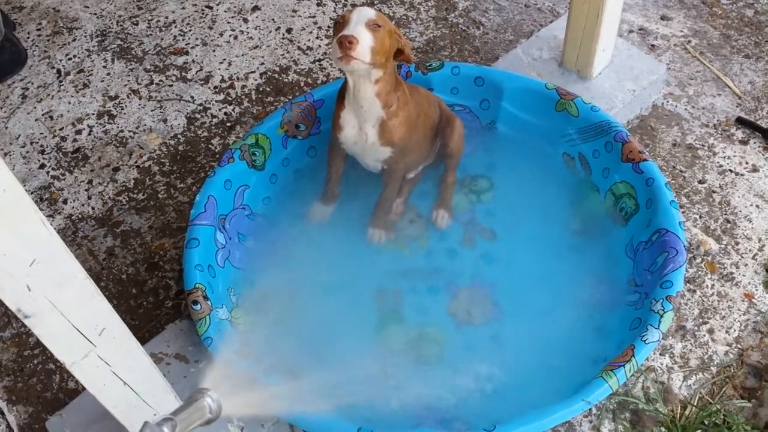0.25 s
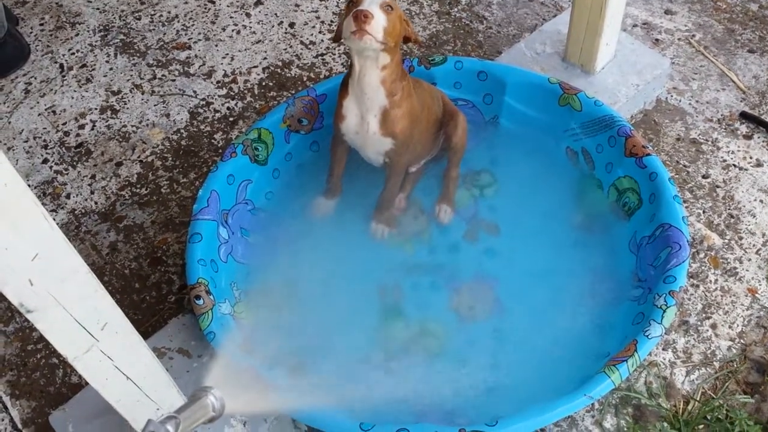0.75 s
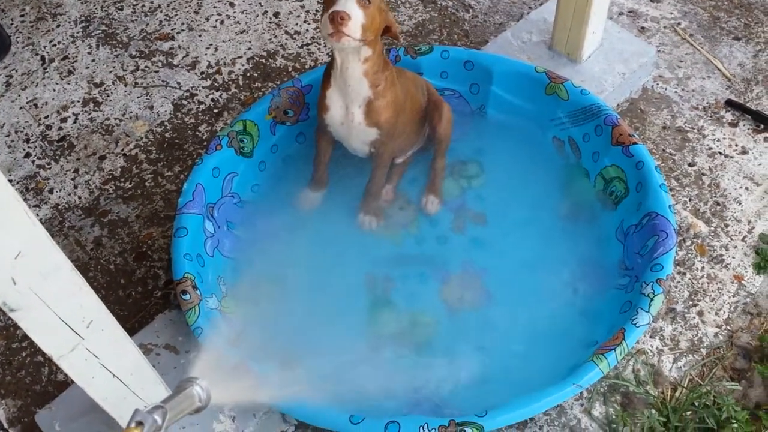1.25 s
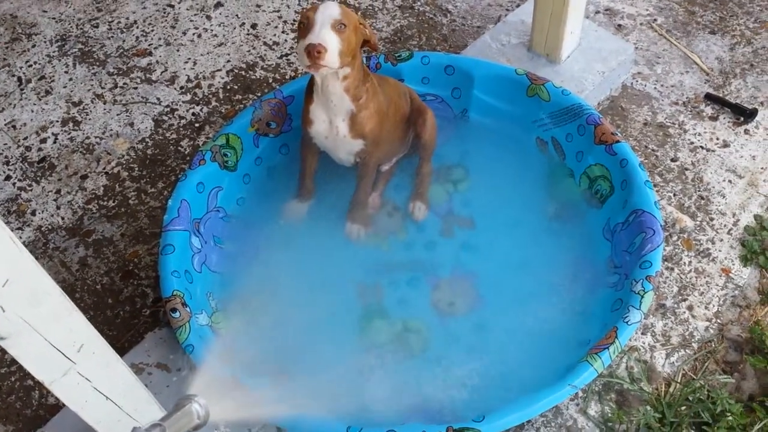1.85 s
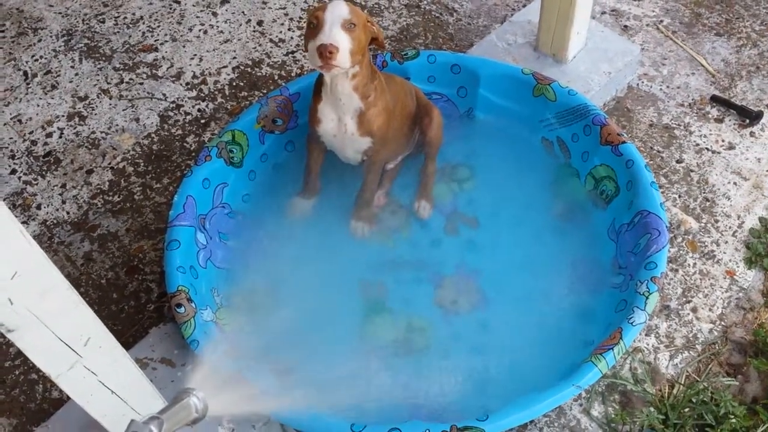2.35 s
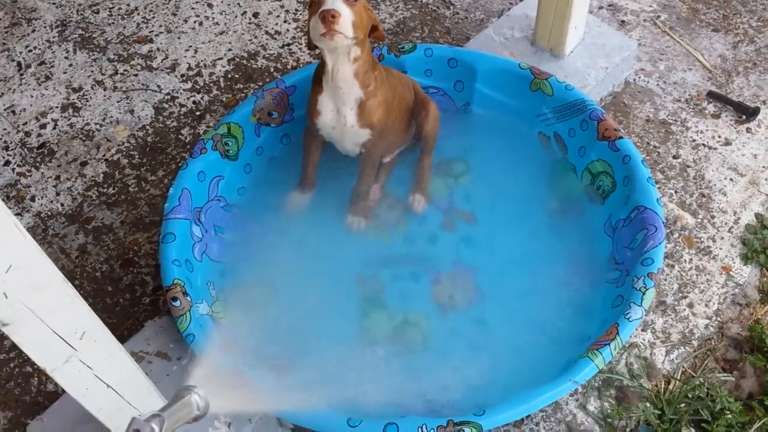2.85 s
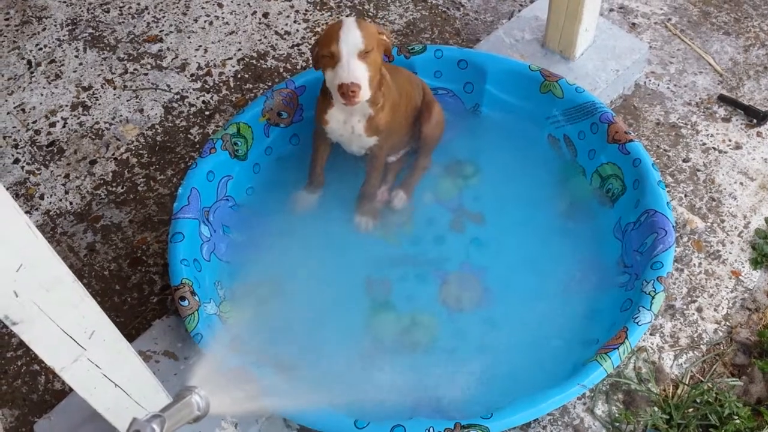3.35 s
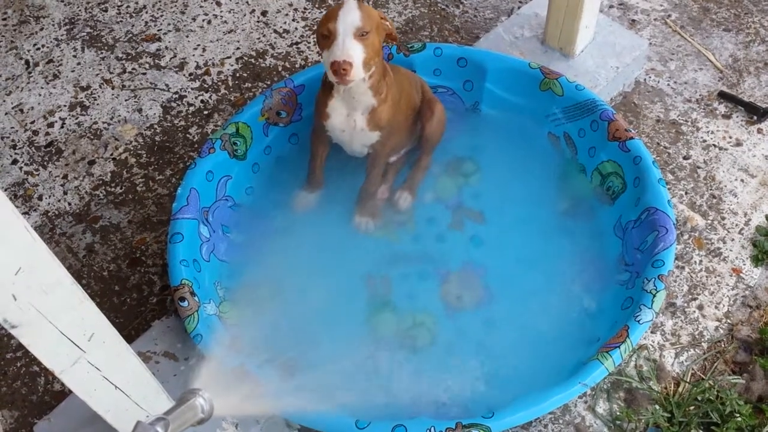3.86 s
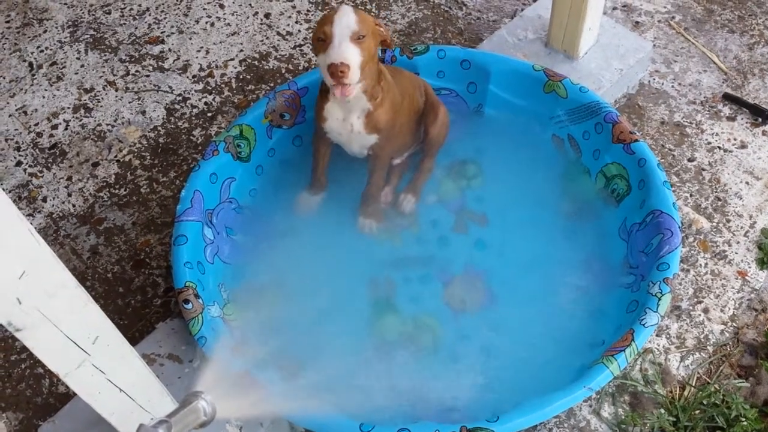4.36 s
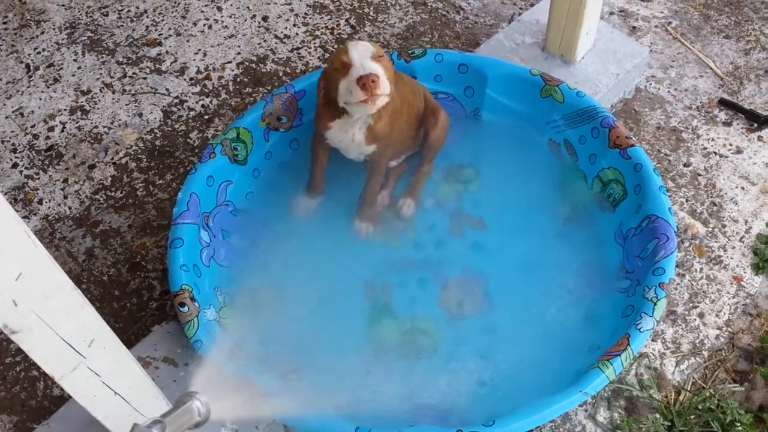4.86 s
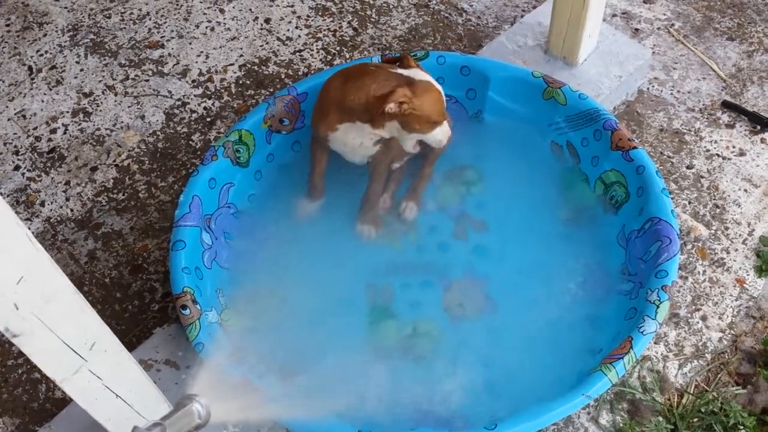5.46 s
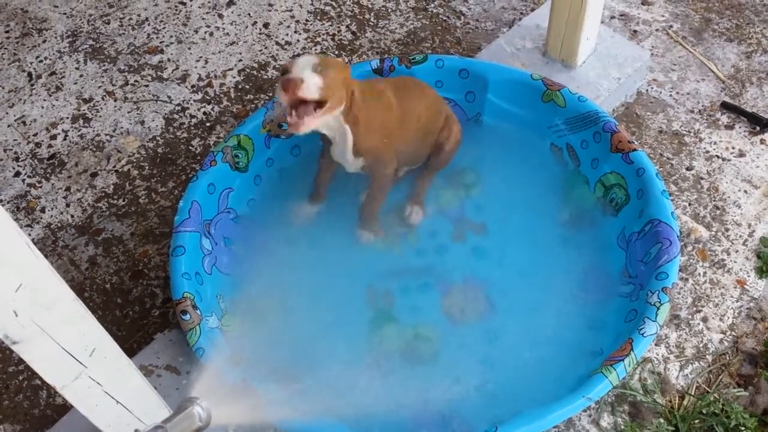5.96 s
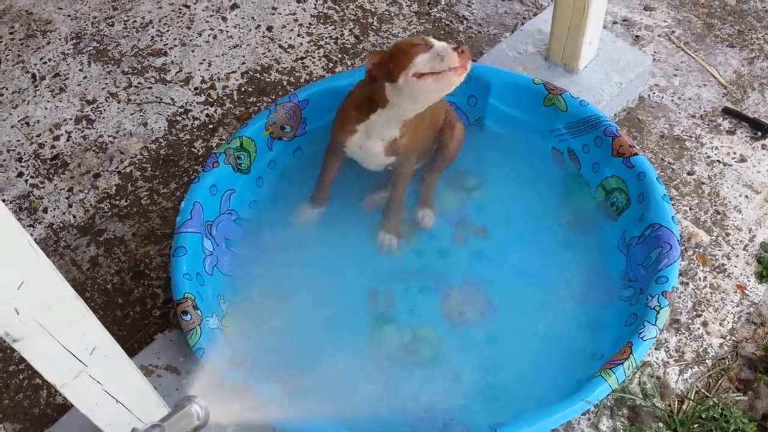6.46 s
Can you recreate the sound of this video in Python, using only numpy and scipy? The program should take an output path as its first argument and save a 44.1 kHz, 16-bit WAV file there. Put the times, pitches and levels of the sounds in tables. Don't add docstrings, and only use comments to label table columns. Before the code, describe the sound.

From 0 s a garden hose nozzle is already spraying into a plastic paddling pool an arm's length away, and it continues to the cut at about 6.7 s. Innumerable fine drops fuse into a dense, bright, wide hiss, strongest in the upper mids, with faint hollow resonances of the thin pool wall beneath. Brief light stutters pass at 0.5, 1.3, 3.0 and 3.4 s, each refilling almost at once. The spray is slightly fuller from 2.6 to 3.8 s, chokes more clearly at 4.4 s, sinks gently until about 5.2 s, then builds again. Another small stutter falls at 5.8 s and one round bubble plop at 6.0 s, slightly right. Barely noticeable low air puffs touch single sides, mostly right, between 0.5 and 4.7 s. A distant motor hum is nearly buried. The left side rings, the right is open; outdoor, dry, slightly grainy camera sound.

```python
import sys
import numpy as np
from scipy import signal
from scipy.fft import rfft, irfft, dct, next_fast_len
from scipy.io import wavfile
from scipy.ndimage import uniform_filter1d

SR = 44100
rng = np.random.default_rng(int(sys.argv[2]) if len(sys.argv) > 2 else 0)


def digitize_waveform(pressure):
    field = np.atleast_2d(pressure).T
    bounded = np.clip(field, -1, 1)
    quanta = np.round(bounded * 32767).astype(np.int16)
    wavfile.write(sys.argv[1], SR, quanta)


def natural_amplitude(level_db):
    exponent = np.asarray(level_db, float) / 20
    return 10 ** exponent


N = 295911


def evened(x):
    return x / np.sqrt(np.mean(x ** 2) + 1e-20)


def read(points, hz):
    f, value = np.transpose(points)
    return np.interp(np.log(hz + 1), np.log(f + 1), value)


def add(mix, start_s, sound, pan_db):
    start = round(start_s * SR)
    part = mix[:, start:start + len(sound)]
    port_gain = natural_amplitude([[min(pan_db, 0)], [min(-pan_db, 0)]])
    part += port_gain * sound[:part.shape[1]]


def drops(spread_db, clump_db):
    size = natural_amplitude(spread_db * np.minimum(rng.exponential(1, (2, N)), 6))
    clumps = uniform_filter1d(rng.standard_normal(N), size=120)
    clumps = evened(uniform_filter1d(clumps, size=120))
    impacts = rng.standard_normal((2, N))
    return evened(impacts * size * natural_amplitude(clump_db * clumps))


def jet_db(hz, t):
    # (time [s], level [dB])
    pressure = [(0.0, -18), (0.42, -17), (0.55, -19), (2.35, -18.5), (2.62, -17), (3.79, -17), (4.34, -18),
                (4.38, -19), (4.8, -20.5), (5.15, -21), (5.3, -19.5), (6.41, -17.5), (6.71, -18)]
    # (time [s], depth [dB])
    stutters = [
        (0.482, -2.5),
        (1.313, -2.5),
        (2.98, -2.5),
        (3.387, -2.5),
        (4.359, -5.5),
        (5.81, -3.5),
    ]
    usual_db, body_share, fizz_share = -18.5, 0.73, 0.89
    choke_s, refill_s = 0.0033, 0.025
    body = np.interp(hz, [1600, 2100], [1, 0])[:, None]
    fizz = np.interp(hz, [8000, 10500], [0, 1])[:, None]
    follows = 1 + body * (body_share - 1) + fizz * (fizz_share - 1)
    pressure_db = np.interp(t, *np.transpose(pressure))
    level = usual_db + follows * (pressure_db - usual_db)
    for start_s, depth_db in stutters:
        since = np.maximum(t - start_s, 0)
        choke = np.minimum(since / choke_s, 1)
        level = level + depth_db * choke * np.exp(-(since / refill_s) ** 2)
    return level


def spray(patchy_db, surge_db, offset_db):
    # (frequency [Hz], density [dB per Hz])
    open_port = [(86, -71), (345, -64), (517, -62), (861, -64), (1809, -62.5), (2584, -57.5), (2929, -59),
                 (4651, -57.5), (5168, -55.5), (5943, -57), (8786, -53.5), (11456, -59), (13092, -59.5),
                 (14384, -61)]
    # (frequency [Hz], density [dB per Hz])
    deep_low = [(86, -72), (345, -63.5), (517, -63), (861, -65), (1378, -59.5), (1723, -61.5), (2067, -60),
                (2498, -52.5), (2670, -51), (3015, -52), (3273, -52), (3618, -54.92)]
    deep_high = [(3618, -54), (4393, -53), (4823, -47.5), (5340, -53.5), (6029, -48), (6804, -50),
                 (8096, -58), (8699, -59), (10422, -65.5),
                 (11283, -73.5), (12145, -70), (12920, -74), (14384, -73.5)]
    # (frequency [Hz], likeness [0-1])
    likeness = [(86, 0.8), (517, 0.84), (1550, 0.42), (1723, 0.17), (2412, 0.61), (2842, 0.33),
                (3359, 0.46), (3531, 0.2), (4996, 0.28), (5254, 0.1), (5771, 0.38), (8269, 0.06),
                (8786, 0.19), (10939, 0.05)]
    # (frequency [Hz], phase [rad])
    right_leads = [(86, -0.0), (1292, 0.13), (1637, 1.01), (2239, -0.18), (3015, 0.55), (3531, 2.72),
                   (3704, 0.98), (3962, 1.8), (5254, 11.06), (5426, 14.95), (6374, 19.69), (8269, 23.65),
                   (8441, 21.29), (10939, 24.31)]
    impacts = drops(spread_db=1.25, clump_db=0.47)
    hz, t, (near, other) = signal.stft(impacts, SR, nperseg=512, noverlap=384)

    patches = rng.standard_normal((len(t), len(hz))).T
    patches = uniform_filter1d(patches, size=12, axis=0)
    patches = evened(uniform_filter1d(patches, size=30, axis=1))
    surges = evened(uniform_filter1d(rng.standard_normal(len(t)), size=14))

    same = np.clip(read(likeness, hz), 0, 1)[:, None]
    lead = np.exp(1j * read(right_leads, hz))[:, None]
    right = same * lead * near + np.sqrt(1 - same ** 2) * other
    deep_db = read(deep_low[:-1] + deep_high, hz)
    colour_db = np.array([deep_db, read(open_port, hz)])[:, :, None]
    level_db = colour_db + jet_db(hz, t) + patchy_db * patches + surge_db * surges + offset_db
    ports = np.array([near, right]) * natural_amplitude(level_db)
    return signal.istft(ports, SR, nperseg=512, noverlap=384)[1][:, :N]


def pool(x):
    # (frequency [Hz], width [Hz], lift [dB])
    wall_notes = [(140.6, 20, 8), (208.6, 20, 3), (249, 60, 3), (496, 19, 6), (568, 12, 6.5), (636, 7.6, 6),
                  (1150, 29, 3.5)]
    size = next_fast_len(N)
    hz = np.fft.rfftfreq(size, 1 / SR)
    lift_db = sum(db / (1 + (2 * (hz - f) / width) ** 2) for f, width, db in wall_notes)
    return irfft(rfft(x, size) * natural_amplitude(lift_db), size)[:, :N]


def plops():
    # (time [s], peak [dB], frequency [Hz], left-right [dB])
    bubbles = [
        (5.9655, -15.5, 930, -2),
    ]
    out, t = np.zeros((2, N)), np.arange(600) / SR
    ring_s, overtone_s = 0.0017, 0.001
    for start_s, db, hz, pan_db in bubbles:
        ring_swell = t / ring_s * np.exp(1 - t / ring_s)
        ring = np.sin(2 * np.pi * 1.06 * hz * t) * ring_swell
        overtone_swell = t / overtone_s * np.exp(1 - t / overtone_s)
        overtone = natural_amplitude(-3.5) * np.sin(2 * np.pi * 1.7 * hz * t) * overtone_swell
        add(out, start_s, natural_amplitude(db) * (ring + overtone), pan_db)
    return out


def puffs():
    # (time [s], peak [dB], port [1 left, -1 right])
    gusts = [(0.528, -47, 1), (0.648, -44, 1), (0.839, -44, -1), (1.865, -50, -1), (2.125, -37, -1),
             (3.057, -40, -1), (3.307, -35.5, -1), (3.426, -38, -1), (3.865, -39, -1), (3.92, -39, -1),
             (4.015, -41, -1), (4.375, -39, -1), (4.42, -40, -1), (4.46, -41, -1), (4.51, -42, -1),
             (4.6, -44, -1), (4.701, -46, -1)]
    low_hz, span_hz, shelter_db = 45, 45, 33
    out, t = np.zeros((2, N)), np.arange(2000) / SR
    chances = rng.random((len(gusts), 2))
    for (start_s, db, port), (pitch, phase) in zip(gusts, chances):
        swing = np.sin(2 * np.pi * ((low_hz + span_hz * pitch) * t + phase)) * np.hanning(len(t))
        add(out, start_s + 0.0084, natural_amplitude(db + 7.5) * swing, shelter_db * np.sign(port))
    return out


def hum():
    hum_hz, hum_db, waver_db = 119.3, -47, 2.1
    waver = evened(uniform_filter1d(rng.standard_normal(N), size=4000))
    port_db = np.array([[0], [-2.5]])
    tone = np.sin(2 * np.pi * hum_hz * np.arange(N) / SR)
    return natural_amplitude(hum_db + waver_db * waver + port_db) * tone


def scene():
    water = pool(spray(patchy_db=0.69, surge_db=0.28, offset_db=62.0))
    return water + plops() + puffs() + hum()


def gate(x, limits, grid, unsteady_db):
    hop, follows = 1024, 0.7
    window = np.sin(np.pi * (np.arange(2 * hop) + 0.5) / (2 * hop))
    padded = np.pad(x, ((0, 0), (2 * hop - grid, 2 * hop)))
    frames = np.lib.stride_tricks.sliding_window_view(padded, 2 * hop, axis=1)[:, ::hop] * window
    a, b, c, d = np.split(frames, 4, axis=2)
    folded = np.dstack([-c[..., ::-1] - d, a - b[..., ::-1]])
    lines = dct(folded, type=4, norm="ortho")
    hz = (np.arange(hop) + 0.5) * SR / (2 * hop)

    drift = evened(uniform_filter1d(rng.standard_normal(lines.shape[:2]), size=3))
    loud_db = uniform_filter1d(10 * np.log10(np.mean(lines ** 2, axis=2) + 1e-9), size=5)
    louder_db = loud_db - np.median(loud_db, axis=1, keepdims=True)
    limit_db = unsteady_db * drift + follows * louder_db
    kept = lines * (abs(lines) > natural_amplitude(read(limits, hz) + limit_db[..., None]))

    late, early = np.split(dct(kept, type=4, norm="ortho"), 2, axis=2)
    back = np.dstack([early, -early[..., ::-1], -late[..., ::-1], -late]) * window
    joined = back[:, 1:, :hop] + back[:, :-1, hop:]
    return joined.reshape(2, -1)[:, hop - grid:][:, :N]


def band_limit(x):
    return signal.sosfilt(signal.butter(12, 15320, fs=SR, output="sos"), x)


def record(dry):
    # (frequency [Hz], limit [dB])
    bass_limits = [(40, -23), (150, -17.5), (330, -18), (450, -22.5), (600, -26), (800, -21), (1800, -22),
                   (2400, -40)]
    treble_limits = [(7000, -40), (9000, -26), (10500, -22.5), (14500, -22.5)]
    soft = 1.1 * np.tanh(dry / 1.1)
    treble_cut = signal.firwin(1023, 14520, window=("kaiser", 9), fs=SR)
    band = signal.oaconvolve(soft, treble_cut[None], "same")
    band = signal.sosfilt(signal.butter(1, 80, "high", fs=SR, output="sos"), band)
    band = gate(band, bass_limits, grid=800, unsteady_db=1.6)
    band = gate(band, treble_limits, grid=320, unsteady_db=0.8)
    return band_limit(band)


dry = scene()
out = record(dry)
digitize_waveform(out)
```